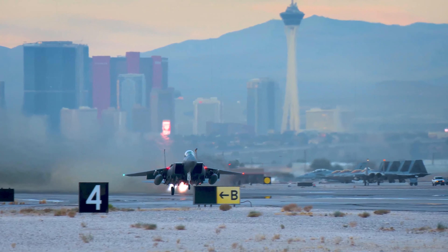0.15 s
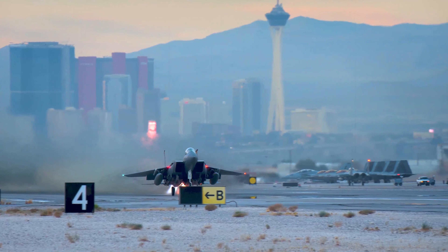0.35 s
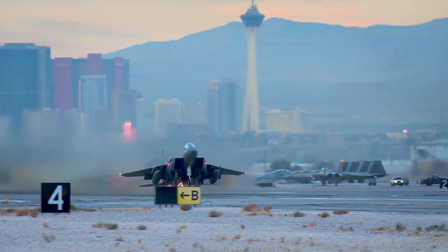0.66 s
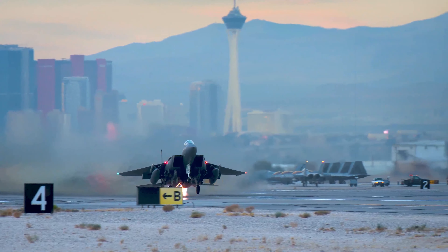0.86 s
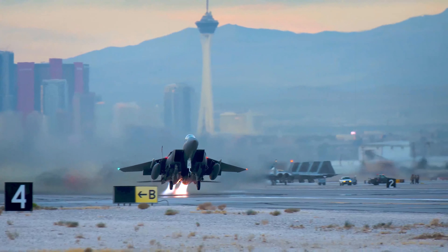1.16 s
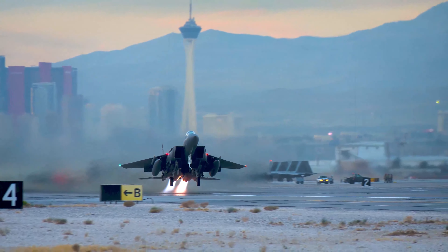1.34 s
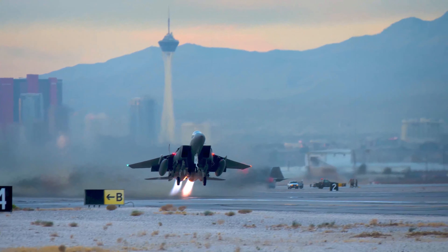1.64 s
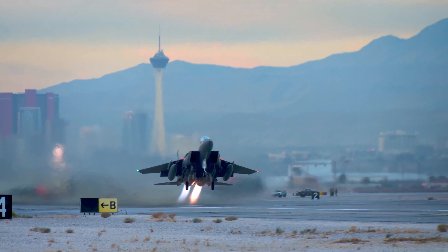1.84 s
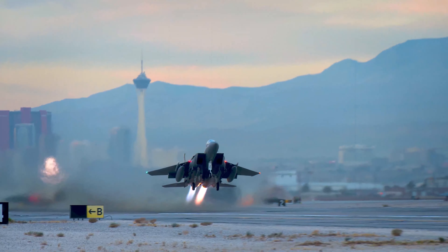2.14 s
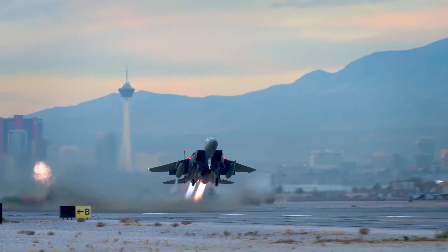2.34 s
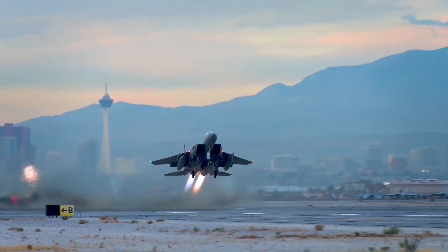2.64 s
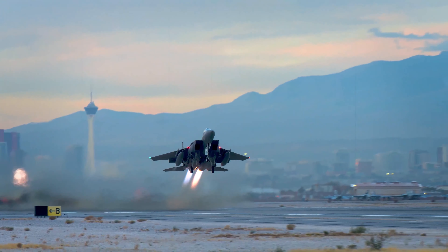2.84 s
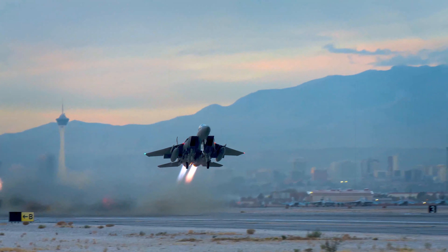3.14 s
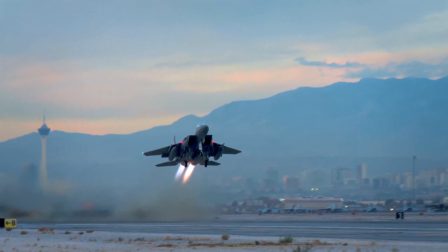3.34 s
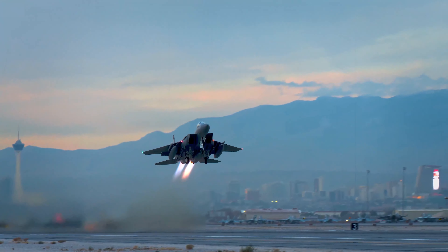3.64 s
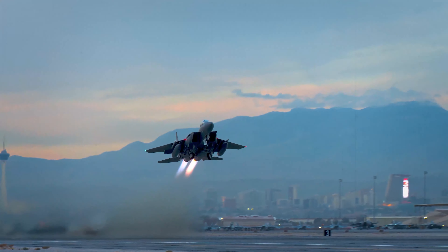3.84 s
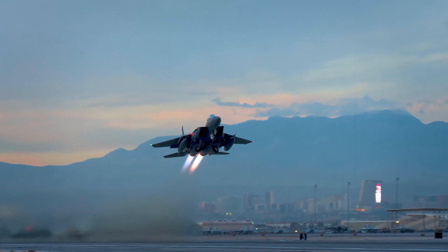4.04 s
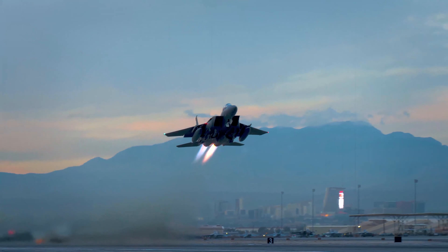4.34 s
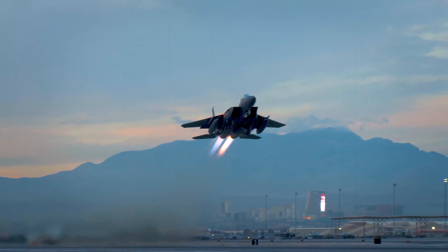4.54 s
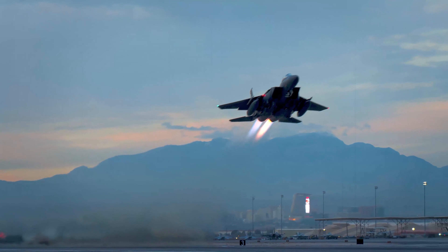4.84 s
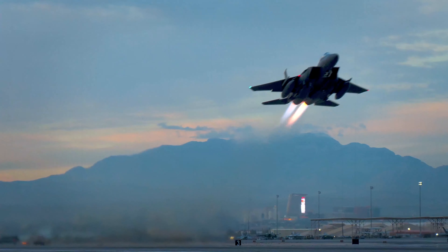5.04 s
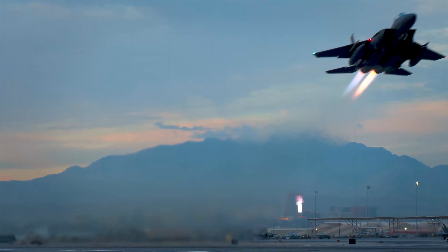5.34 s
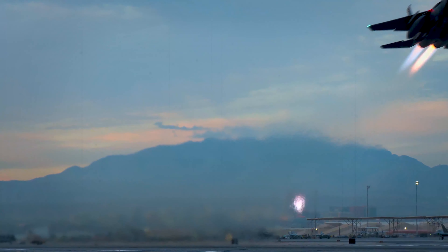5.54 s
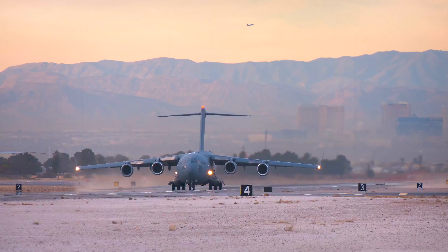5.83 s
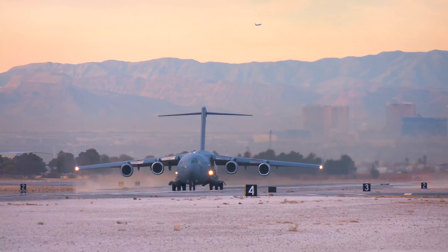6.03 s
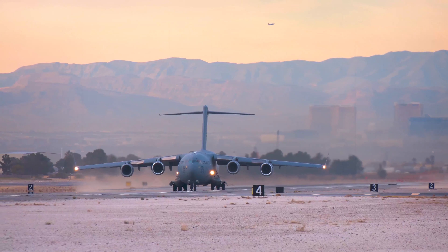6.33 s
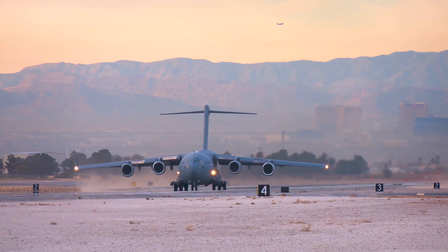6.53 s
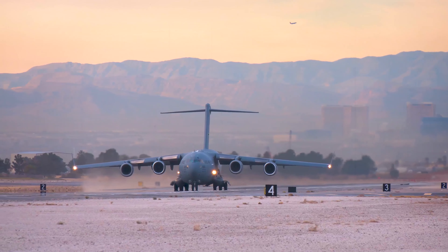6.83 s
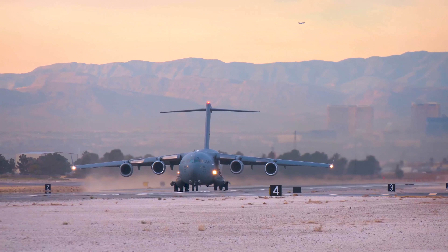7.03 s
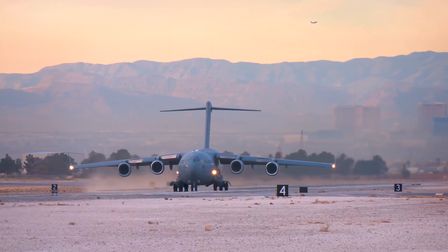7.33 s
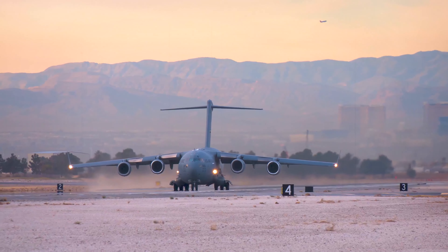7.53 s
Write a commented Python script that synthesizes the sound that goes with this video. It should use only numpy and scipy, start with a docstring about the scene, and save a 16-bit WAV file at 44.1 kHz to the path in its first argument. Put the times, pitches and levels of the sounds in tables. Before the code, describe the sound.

Fighter takeoff at an airfield: hushed rumble builds to a tearing, crackling roar, then a hard cut to steady, bass-heavy distant transport engines.

```python
"""Far down a runway a fighter jet on afterburner begins as faint shaped noise and breathy whines.
As it lifts off the roar swells, its pressure peaks steepen into crackling shocks, and delayed copies
off the ground comb the sound. At 5.86 s a hard cut leads to a transport jet rolling far away: smooth
bass-heavy noise with faint whines. One microphone feeds the left channel; the right input only hisses."""
import sys
import numpy as np
from scipy import signal
from scipy.fft import rfft, irfft, next_fast_len
from scipy.io import wavfile
from scipy.ndimage import uniform_filter1d

SR = 44100
rng = np.random.default_rng(int(sys.argv[2]) if len(sys.argv) > 2 else 0)


def store_wav(level_fs):
    """Save 16-bit WAV to argv[1]."""
    pcm = np.round(np.clip(np.atleast_2d(level_fs), -1, 1) * 32767)
    wavfile.write(sys.argv[1], SR, pcm.T.astype(np.int16))


N = 338681

# All source levels are set ahead of the microphone gain, the near bounce and the rounding of peaks.

# Borders in Hz between thunder, rumble, growl, roar, rasp, crackle and sizzle.
PLUME_EDGES_HZ = [95, 250, 480, 1400, 3200, 5500]
# How strongly each of those seven bands takes part in the shocks (factor).
SHOCK_REACH = [0, 0.17, 0.54, 0.7, 0.65, 1.12, 1.28]
# Colour of the exhaust inside the bands. Each row: frequency in Hz, relative density in dB per Hz.
PLUME_COLOUR = [(25, -74), (45, -38.5), (84, -20), (135, -6), (270, -8.5), (380, -4), (500, -3), (900, 1),
                (1300, -2.5), (1560, -7), (1900, -5), (2200, -10), (2500, -13), (2850, -13), (3200, -18),
                (3600, -18.5), (4250, -23.5), (5500, -35.5), (8000, -55), (10000, -62), (15500, -70)]
# How much of the roar has steepened. Each row: time in seconds, share of shocks from 0 to 1.
STEEPNESS = [(0, 0), (1.9, 0.66), (2.3, 1), (2.7, 0.8), (3.2, 0.4), (3.7, 0.74), (4.0, 0.55), (4.25, 0.56),
             (4.7, 0.5), (5.2, 0.07), (5.86, 0.24)]
FIRST_SHARP_BAND = 5  # from crackle upward the steeper fronts rule


def fighter_exhaust():
    """Turbulent mixing noise and steepened shocks share one colour; each band follows its own level."""
    levels_db = fighter_levels()
    share = in_time(STEEPNESS)[0]
    noise = rng.standard_normal(N)
    trains = shock_train(per_s=1300.0, spread_db=2.0, clump_db=4.0, steepening=2.6)
    bands = split(np.array([noise, *trains]), PLUME_COLOUR, PLUME_EDGES_HZ)
    plume = spurts() + strong_shocks(body_hz=2940, body_db=28.0, edge_hz=4800, edge_db=9.0,
                                     edge_floor_db=-77, ragged_ms=1.04)
    for k, (turbulence, blunt, sharp) in enumerate(bands):
        shocks = sharp if k >= FIRST_SHARP_BAND else blunt
        steep = np.clip(share * SHOCK_REACH[k], 0, 1)
        mix = np.sqrt(1 - steep) * rms_one(turbulence) + np.sqrt(steep) * rms_one(shocks)
        plume = plume + from_db(levels_db[k]) * mix
    return plume


# Exhaust as the jet rolls, lifts and passes. Each row: time in seconds, roar in dB, crackle in dB.
FIGHTER_LEVELS = [(0, -47, -75), (1.0, -45.5, -74.5), (1.6, -44, -79), (2.0, -39, -71.5),
                  (2.26, -33.5, -64.5), (2.32, -32, -60), (2.5, -34, -54), (2.56, -34.5, -57),
                  (2.62, -32.5, -56.5), (2.85, -38, -62), (3.1, -39, -59.5), (3.22, -35.5, -54.5),
                  (3.36, -36, -57.5), (3.46, -31.5, -51.5), (3.53, -32.5, -51.5), (3.6, -30, -47.5),
                  (3.82, -28.5, -41), (3.95, -27, -45.5), (4.0, -30, -48.5), (4.1, -28, -48),
                  (4.3, -27.5, -49.5), (4.45, -28.5, -52.5), (4.6, -30.5, -51), (4.75, -32.5, -54.5),
                  (4.85, -33.5, -55), (5.05, -33.5, -57), (5.25, -34.5, -55), (5.4, -36.5, -57),
                  (5.55, -36.5, -57), (5.7, -36.5, -56), (5.78, -32.5, -54), (5.86, -32, -53.5)]
# Its slower bass. Each row: time in seconds, thunder in dB, rumble in dB, growl in dB.
FIGHTER_BASS = [(0, -55.5, -47.5, -61), (1.1, -54.5, -46.5, -54.5), (1.75, -54, -48, -57),
                (2.15, -60, -49.5, -45.5), (2.4, -58, -48.5, -41), (2.7, -59, -40, -40.5),
                (2.9, -60, -42.5, -42), (3.25, -61, -42, -39.5), (4.0, -58, -35.5, -39.5),
                (4.35, -52, -34.5, -41), (4.8, -48.5, -38.5, -39.5), (5.15, -51, -38.5, -41.5),
                (5.45, -50, -42, -45), (5.86, -57, -41.5, -35.5)]
# Rasp above a blend of roar and crackle. Each row: time in seconds, lift in dB.
RASP_LIFT = [(0, 1.7), (1.0, 1.5), (1.7, 7.5), (2.3, 3.8), (3.0, 6.1), (3.6, 4.1), (4.3, 3.9), (4.65, 3.7),
             (4.95, 4), (5.15, 2.5), (5.4, 3.1), (5.7, 0.91), (5.86, 0.67)]
RASP_LEAN = 0.46  # share of the crackle in that blend
# Trim of the topmost band. Each row: time in seconds, gain in dB.
SIZZLE_TRIM = [(0, 0), (2.3, 3), (2.6, 2), (3.2, -1), (3.6, 1), (3.8, 2.5), (4.0, -2), (4.1, -1.5),
               (4.25, 0.5), (4.4, -1), (4.6, 2), (4.8, -4), (5.5, -4.5), (5.86, 3.5)]
# The untrimmed sizzle stands at SIZZLE_DB when crackle is at LOUD_CRACKLE_DB, and swings wider (factor).
SIZZLE_DB, SIZZLE_SWING, LOUD_CRACKLE_DB = -55, 1.53, -46


def fighter_levels():
    """Level of each band in dB, from thunder up to sizzle; rasp and sizzle follow the crackle."""
    roar, crackle = in_time(FIGHTER_LEVELS)
    rasp = in_time(RASP_LIFT)[0] + roar + RASP_LEAN * (crackle - roar)
    sizzle = SIZZLE_DB + in_time(SIZZLE_TRIM)[0] + SIZZLE_SWING * (crackle - LOUD_CRACKLE_DB)
    return in_time(FIGHTER_BASS) + [roar, rasp, crackle, sizzle]


def shock_train(per_s, spread_db, clump_db, steepening):
    """Random overpressure fronts of one sign, in clumps; stronger fronts are steeper, so they rule the treble."""
    rate = per_s * from_db(clump_db * drift(rate_hz=9.0))
    born = rng.random(N) < rate / SR
    size_db = spread_db * np.minimum(rng.exponential(1, N), 4)
    blunt = born * from_db(size_db)
    sharp = born * from_db(steepening * size_db)
    return blunt, sharp


# The strongest shocks, before filtering. Each row: time in seconds, strength in dB, sharp edge in dB.
SHOCKS = [(2.05, -43, -74), (2.136, -46, -74), (2.2933, -34, -73), (2.323, -33, -73), (2.3504, -32, -72),
          (2.38, -28, -71), (2.4095, -33, -65), (2.4422, -36, -75), (2.4794, -31, -67), (2.4987, -36, -71),
          (2.5883, -34, -60), (2.6064, -32, -75), (2.6178, -32, -73), (2.99, -35, -73), (3.0136, -37, -73),
          (3.218, -39, -67.5), (3.293, -32, -74), (3.4379, -29, -71), (3.481, -31, -71), (3.562, -26, -71),
          (3.587, -28, -67), (3.629, -43, -51), (3.673, -47, -55), (3.683, -53, -53), (3.7055, -32, -46),
          (3.718, -24, -61), (3.7338, -39, -51), (3.766, -47, -50), (3.814, -45, -50), (3.82, -45, -54),
          (3.83, -39, -50), (3.8355, -32, -44), (3.862, -47, -46), (3.886, -28, -46), (3.9384, -49, -47),
          (3.941, -24, -56), (3.963, -23, -46), (3.9769, -52, -53), (4.012, -24, -48), (4.0836, -28, -68),
          (4.179, -50, -53), (4.212, -43, -53), (4.253, -35, -57), (4.258, -46, -49), (4.2635, -50, -57),
          (4.307, -29, -57), (4.3363, -34, -66), (4.4384, -27, -57), (4.48, -32, -69), (4.5657, -25, -58),
          (4.5992, -29, -59), (4.655, -31, -56), (4.7666, -31, -59), (5.0115, -51, -74), (5.038, -39, -62),
          (5.792, -33, -74), (5.8178, -29.5, -68)]


def strong_shocks(body_hz, body_db, edge_hz, edge_db, edge_floor_db, ragged_ms):
    """Single fronts that stand out: a rounded overpressure with a dip behind it, and a ragged sharp edge."""
    s, strength_db, sharp_db = np.transpose(SHOCKS)
    at = np.round(s * SR).astype(int)
    fronts, edges = np.zeros((2, N))
    fronts[at] = from_db(strength_db + body_db)
    # only the part of each sharp edge above a fixed floor counts; weaker edges add nothing
    edges[at] = np.maximum(from_db(sharp_db) - from_db(edge_floor_db), 0) * from_db(edge_db)
    body = filtered(fronts, 4, body_hz)
    body = filtered(body, 1, 600, "high")  # leaves the dip
    decay = np.exp(-1000 / (ragged_ms * SR))
    tearing = signal.lfilter([1], [1, -decay], edges) * rng.standard_normal(N)
    return body + filtered(tearing, 1, [edge_hz, 2.27 * edge_hz], "band")


# Spurts of tearing crackle. Each row: time in seconds, strength in dB before gain and smoothing.
SPURTS = [(2.0485, -61), (2.1338, -57), (2.2924, -58), (2.2924, -53), (2.2979, -51), (2.3156, -49),
          (2.3488, -51), (2.3548, -42), (2.3782, -41), (2.4082, -43), (2.4401, -42), (2.4776, -42),
          (2.5523, -51), (2.5873, -50), (2.5873, -39), (2.6247, -40), (2.7, -43), (2.8153, -52),
          (2.8946, -55), (2.947, -50), (2.9894, -49), (3.0108, -49), (3.0682, -54), (3.0931, -54),
          (3.1186, -48), (3.1789, -46), (3.2014, -48), (3.2163, -41), (3.2667, -50), (3.2839, -48),
          (3.3231, -49), (3.3735, -45), (3.4269, -43), (3.4363, -43), (3.4363, -35), (3.4553, -41),
          (3.4807, -32), (3.5311, -44), (3.5596, -40), (3.5825, -36), (3.587, -33), (3.6304, -29),
          (3.6818, -38), (3.7042, -33), (3.7222, -23), (3.7451, -32), (3.7638, -32), (3.7746, -26),
          (3.8342, -23), (3.8835, -28), (3.9382, -29), (3.9611, -26), (3.9958, -50), (4.011, -31),
          (4.021, -37), (4.0824, -33), (4.1926, -37), (4.2107, -25), (4.251, -38), (4.2774, -42),
          (4.3057, -34), (4.334, -32), (4.4146, -37), (4.4381, -41), (4.4785, -41), (4.5139, -48),
          (4.5633, -34), (4.5827, -37), (4.598, -26), (4.6187, -33), (4.6456, -39), (4.6546, -31),
          (4.6965, -45), (4.7404, -43.5), (4.7653, -49), (4.9384, -53), (5.0108, -53), (5.0367, -45),
          (5.107, -52), (5.3126, -57), (5.5989, -50), (5.6353, -51), (5.6438, -51), (5.7062, -48),
          (5.8164, -42)]
SPURT_RISE_MS, SPURT_FALL_MS, SPURT_GAIN_DB = 1.7, 2.06, -6
# Lower and upper edge of the spurt noise in Hz.
SPURT_BAND_HZ = [2900, 6100]


def spurts():
    """Clumps of small fronts too dense to part: short bursts of bright noise."""
    s, strength_db = np.transpose(SPURTS)
    shape = np.zeros(N)
    shape[np.round(s * SR).astype(int)] = from_db(strength_db + SPURT_GAIN_DB)
    rise, fall = np.exp(-1000 / (np.array([SPURT_RISE_MS, SPURT_FALL_MS]) * SR))
    shape = signal.lfilter([1], [1, -fall], shape + 1e-18)
    shape = signal.lfilter([1 - rise], [1, -rise], shape)
    return shape * rms_one(filtered(rng.standard_normal(N), 3, SPURT_BAND_HZ, "band"))


# Echoes as the jet climbs. Each row: time in seconds, delays in ms off runway, verge, apron and sand,
# then strengths (factors) of runway, verge, apron and sand; below zero, sand turns the wave over.
GROUND_ECHOES = [(0.0, 3.1, 4.3, 1.55, 3.6, 0.15, 0.15, 0.1, -0.05),
                 (0.7, 2.75, 4.2, 1.55, 3.6, 0.1, 0.1, 0.05, -0.05),
                 (1.4, 3.03, 4.28, 1.69, 2.81, 0.04, 0.02, 0.12, -0.22),
                 (1.7, 3.12, 3.85, 1.48, 2.61, 0.12, 0.12, 0.1, -0.18),
                 (2.0, 3.02, 3.96, 1.62, 2.48, 0.07, 0.05, 0.12, -0.45),
                 (2.25, 2.78, 3.95, 1.74, 2.31, 0.23, 0.05, 0.15, -0.36),
                 (2.5, 2.71, 3.86, 1.36, 2.21, 0.27, 0.05, 0.19, -0.29),
                 (2.8, 2.62, 3.72, 1.42, 2.07, 0.36, 0.18, 0.42, -0.14),
                 (3.1, 2.52, 3.93, 1.41, 1.9, 0.21, 0.15, 0.21, -0.26),
                 (3.35, 2.09, 3.72, 1.42, 1.96, 0.2, 0.3, 0.19, -0.25),
                 (3.6, 2.0, 3.59, 1.49, 1.85, 0.2, 0.28, 0.33, -0.0),
                 (3.9, 2.15, 3.51, 1.5, 2.89, 0.17, 0.13, 0.14, -0.12),
                 (4.3, 2.16, 3.56, 1.72, 2.78, 0.1, 0.08, 0.14, -0.11),
                 (5.0, 2.62, 3.4, 1.27, 1.8, 0.1, 0.11, 0.16, -0.0),
                 (5.5, 2.43, 3.42, 1.21, 1.92, 0.07, 0.08, 0.06, -0.02),
                 (5.86, 2.43, 3.42, 1.21, 1.92, 0.07, 0.08, 0.06, -0.02)]


def ground_comb(plume):
    """Rough ground returns few highs: softened delayed copies comb the sound, power held about even."""
    delays_ms, strengths = np.split(np.array(in_time(GROUND_ECHOES)), 2)
    soft = filtered(plume, 2, 1600)
    combed = plume + sum(strength * echo(soft, ms) for ms, strength in zip(delays_ms, strengths))
    power = 1 + sum(strength ** 2 for strength in strengths)
    return combed / np.sqrt(power)


# A narrow howl in the low roar comes and goes. Each row: time in seconds, level in dB before wavering.
HOWL = [(0, -49.5), (0.75, -50.5), (1.0, -56), (1.3, -47.5), (1.8, -44.5), (2.1, -50), (4.9, -64),
        (5.1, -45), (5.25, -42.5), (5.4, -38), (5.65, -40), (5.86, -36)]
HOWL_HZ, HOWL_WIDTH_HZ = 370.7, 83
# Strong gliding bands, a list each for high, middle and low.
# Each row: time in seconds, centre in Hz, level in dB.
ROAR_BANDS = [
    [(1.8, 560, -54), (2.1, 590, -46), (2.4, 630, -35), (2.7, 688.5, -45), (3.0, 737, -43), (3.3, 761, -40),
     (3.6, 789, -45), (4.0, 810, -41), (4.4, 831, -39), (4.8, 835, -45), (5.0, 830, -75)],
    [(2.0, 401, -64), (2.4, 420, -39), (2.9, 440, -48.5), (3.3, 500, -42.5), (3.6, 520, -37.5),
     (4.0, 500, -40), (4.4, 499.7, -37), (4.7, 521.5, -48), (5.0, 522, -72)],
    [(2.4, 125.2, -71), (2.9, 130, -47), (3.25, 134.7, -39.5), (3.7, 130, -45.5), (4.2, 135, -41.5),
     (4.6, 135, -44), (5.0, 135.4, -67)],
]
# Widths of those three bands in Hz.
ROAR_BAND_WIDTHS_HZ = [130, 88, 48]


def howl_and_roar_bands():
    """Narrow bands of noise stand out of the roar: a wavering howl and three that glide."""
    tones = from_db(in_time(HOWL)[0]) * whines([(HOWL_HZ, HOWL_WIDTH_HZ, 0)], waver_db=1.5, waver_pitch=0.00993)
    for band, width_hz in zip(ROAR_BANDS, ROAR_BAND_WIDTHS_HZ):
        band_hz, band_db = in_time(band)
        tones = tones + from_db(band_db) * breathy_tone(band_hz, width_hz)
    return tones


# How far compressions outgrow rarefactions. Each row: time in seconds, lean from 0 to 1.
LEAN = [(0, 0), (1.8, 0.07), (2.3, 0.06), (3.0, 0), (3.7, 0.07), (4.2, 0.02), (4.7, 0), (5.3, 0.03),
        (5.86, 0.07)]
STEADY_S = 0.05  # span over which strength is averaged, here and in the breathy tones


def lean(x):
    """Loud air is lopsided: a share of the squared pressure joins the wave."""
    envelope = np.sqrt(uniform_filter1d(x ** 2, size=int(STEADY_S * SR)) + 1e-12)
    squared = filtered(x ** 2 / envelope, 2, [150, 2500], "band")
    return x + np.clip(in_time(LEAN)[0], 0, 1) * squared


# Breathy turbine whines. Each row: mean frequency in Hz, width in Hz, level in dB before lift and wavering.
FIGHTER_WHINES = [(951, 200, -52), (1803, 68, -64.5), (2676, 164, -61), (4240, 120, -92)]
# Lift of all of them together. Each row: time in seconds, gain in dB.
WHINE_LIFT = [(0, -0.5), (0.7, 0.5), (1.3, 2.5), (1.7, -0.5), (2.2, -14), (5.86, 4)]


def fighter():
    """The exhaust combed by the ground joins the howl and leans into compressions; whines lie on top."""
    roar = ground_comb(fighter_exhaust()) + howl_and_roar_bands()
    whine = from_db(in_time(WHINE_LIFT)[0]) * whines(FIGHTER_WHINES, waver_db=1.8, waver_pitch=0.004)
    return lean(roar) + whine


# Far exhaust. Each row: time in seconds, rumble in dB, drone in dB, roar in dB.
TRANSPORT_ENGINES = [(5.86, -46, -51, -47.5), (6.201, -44.5, -48.5, -48), (6.6, -47, -48.5, -48),
                     (7.0, -46, -48, -48), (7.3, -43, -49.5, -48), (7.68, -42, -46, -49.5)]
# Borders in Hz between rumble, drone and roar.
TRANSPORT_EDGES_HZ = [140, 300]
# Its colour inside those bands. Each row: frequency in Hz, relative density in dB per Hz.
TRANSPORT_COLOUR = [(15, -45), (30, -32), (60, -6.5), (86, 2), (110, -2.5), (140, -12.5), (200, -5.5),
                    (270, -13), (360, -19.5), (480, -14.5), (650, -17.5), (800, -15.5), (1050, -18),
                    (1400, -23.5), (1900, -27.5), (2700, -43.5), (3300, -50.5), (6000, -70), (15500, -90)]
# Faint fan whines. Each row: mean frequency in Hz, width in Hz, level in dB before wavering.
TRANSPORT_WHINES = [(2440, 110, -74.5), (2670, 190, -69.5), (4215, 230, -82.5)]


def transport():
    """Smooth far exhaust noise, heavy in the bass, with faint fan whines."""
    bands = split(rng.standard_normal(N), TRANSPORT_COLOUR, TRANSPORT_EDGES_HZ)
    levels_db = in_time(TRANSPORT_ENGINES)
    exhaust = sum(from_db(db) * rms_one(band) for db, band in zip(levels_db, bands))
    return exhaust + whines(TRANSPORT_WHINES, waver_db=1.0, waver_pitch=0.009)


def whines(modes, waver_db, waver_pitch):
    """Blade tones blurred by turbulent air, wavering in strength and pitch."""
    total = 0
    for hz, width_hz, level_db in modes:
        strength = from_db(level_db + waver_db * drift(rate_hz=3.6))
        pitch_hz = hz * (1 + waver_pitch * drift(rate_hz=1.2))
        total = total + strength * breathy_tone(pitch_hz, width_hz)
    return total


def breathy_tone(hz, width_hz):
    """A tone blurred to a narrow band: slow noise on a carrier that may glide; evened in strength."""
    blur = filtered(rng.standard_normal((2, N + SR)), 3, width_hz / 2)[:, SR:]  # drop the filter's start
    phase = 2 * np.pi * np.cumsum(hz * np.ones(N)) / SR
    tone = rms_one(blur[0] * np.cos(phase) + blur[1] * np.sin(phase))
    return tone / np.sqrt(uniform_filter1d(tone ** 2, size=int(STEADY_S * SR)) + 1e-9)


# Bounce off the ground just before the microphone. Each row: time in seconds, strength from 0 to 1.
NEAR_ECHO = [(0, 0.32), (1.4, 0.52), (2.0, 0.03), (2.5, 0.45), (2.8, 0.45), (3.2, 0.6), (3.6, 0.35),
             (4.2, 0.1), (4.9, 0.4), (5.5, 0.06), (6.0, 0.24), (6.8, 0.3), (7.2, 0.05), (7.68, 0.08)]
# How late it arrives. Each row: time in seconds, delay in ms.
NEAR_ECHO_MS = [(0, 0.96), (2.0, 0.94), (2.6, 0.99), (3.2, 0.96), (3.8, 1), (4.5, 0.96), (5.2, 0.87),
                (7.68, 1)]


def near_bounce(air):
    """The small surface before the microphone returns only the highs, about a millisecond late."""
    highs = signal.filtfilt(*signal.butter(1, 2450, "high", fs=SR), air)
    return air + in_time(NEAR_ECHO)[0] * echo(highs, in_time(NEAR_ECHO_MS)[0])


def echo(x, delay_ms):
    """The sound a little later."""
    return np.interp(np.arange(N) - delay_ms * SR / 1000, np.arange(N), x)


def from_db(db):
    """Level in dB to amplitude."""
    return 10 ** (np.asarray(db) / 20)


def rms_one(x):
    """The sound scaled to an RMS of 1."""
    return x / np.sqrt(np.mean(x ** 2) + 1e-20)


def filtered(x, order, hz, kind="low"):
    """Butterworth filter."""
    return signal.sosfilt(signal.butter(order, hz, kind, fs=SR, output="sos"), x)


def in_time(rows):
    """Columns of a table, joined by straight lines in time."""
    s, *columns = np.transpose(rows)
    return [np.interp(np.arange(N) / SR, s, c) for c in columns]


def drift(rate_hz):
    """Slow chance of spread 1: noise twice through a one-pole low-pass."""
    r = np.exp(-2 * np.pi * rate_hz / SR)
    slow = signal.lfilter([1], [1, -2 * r, r * r], rng.standard_normal(N + SR))
    return rms_one(slow[SR:])


def split(x, spectrum, edges_hz, overlap=0.21):
    """Colour a sound and part it into neighbouring bands that sum back to the whole."""
    size = next_fast_len(N)
    pitch = np.log(np.arange(1, size // 2 + 2) * SR / size)  # log frequency, as is the overlap
    hz, db = np.transpose(spectrum)
    coloured = rfft(x, size) * from_db(np.interp(pitch, np.log(hz), db))
    below = [0] + [.5 - .5 * np.tanh((pitch - np.log(e)) / overlap) for e in edges_hz] + [1]
    return [irfft(coloured * (b - a), size)[..., :N] for a, b in zip(below, below[1:])]


CUT_S, CUT_FADE_S = 5.859, 0.0004
MIC_GAIN_DB = 5.0


def scene():
    """The two jets, one after the other, on the left input; the right input is open."""
    after = np.clip((np.arange(N) / SR - CUT_S) / CUT_FADE_S + .5, 0, 1)
    air = (1 - after) * fighter() + after * transport()
    return np.array([from_db(MIC_GAIN_DB) * near_bounce(air), np.zeros(N)])


# Colour of the preamplifier hiss. Each row: frequency in Hz, relative density in dB per Hz.
HISS_COLOUR = [(15, 8), (60, 10), (250, 2.5), (1000, 1.5), (15500, -1.5)]
# Hiss level before the top is cut. Each row: level in dB, left input first, then right.
HISS_DB = [
    [-69.5],
    [-67],
]
HEADROOM, CUTOFF_HZ = 0.7, 15720  # amplitude ceiling of the rounding; stopband edge of the low-pass


def record(dry):
    """Peaks round off, each input adds its own hiss, the top is cut."""
    hiss = split(rng.standard_normal((2, N)), HISS_COLOUR, [])[0]
    rounded = HEADROOM * np.tanh(dry / HEADROOM)
    wet = rounded + from_db(HISS_DB) * rms_one(hiss)
    return signal.sosfilt(signal.cheby2(18, 50, CUTOFF_HZ, fs=SR, output="sos"), wet)


dry = scene()
out = record(dry)
store_wav(out)
```